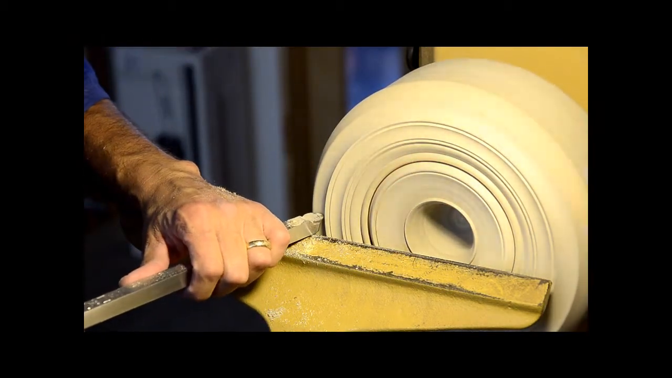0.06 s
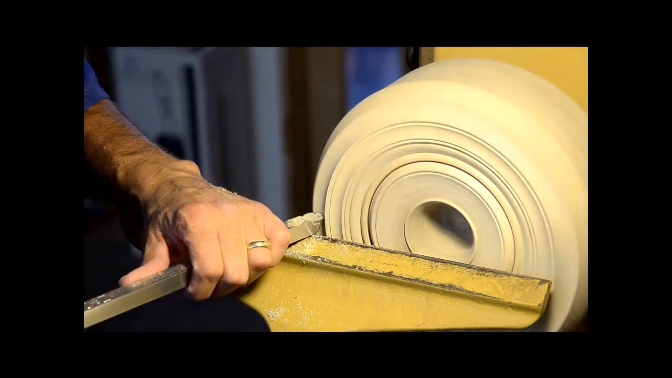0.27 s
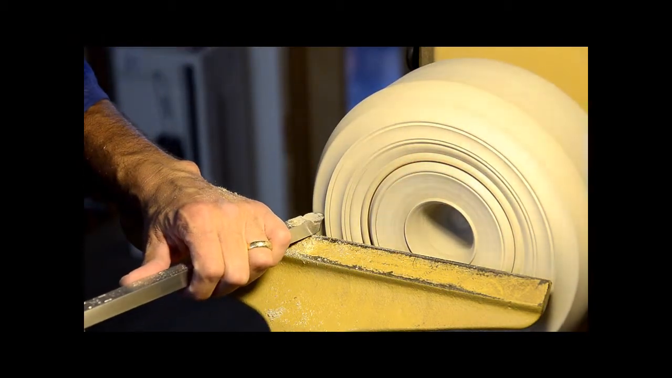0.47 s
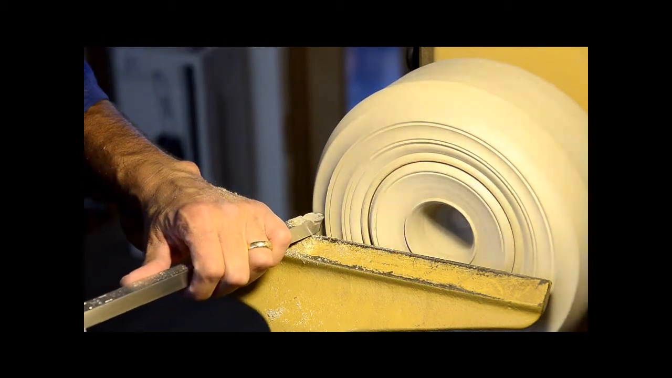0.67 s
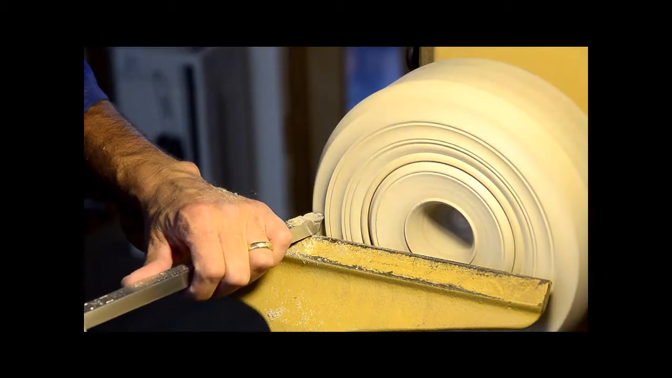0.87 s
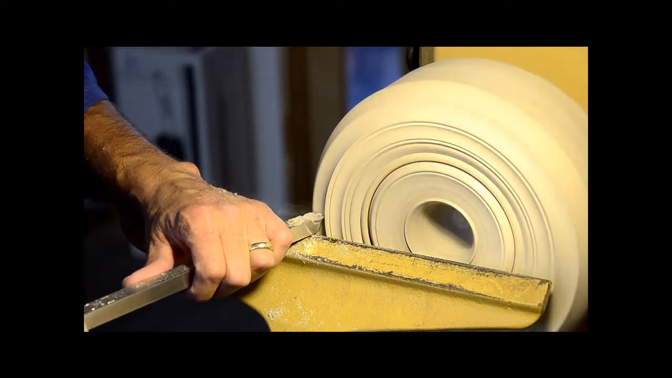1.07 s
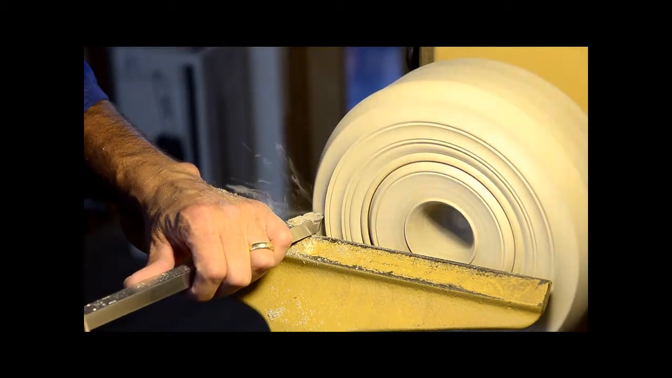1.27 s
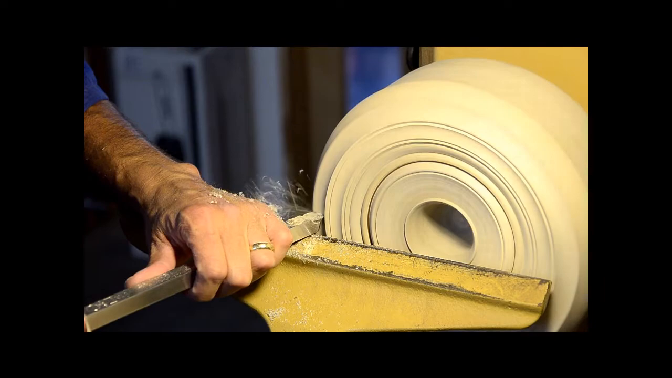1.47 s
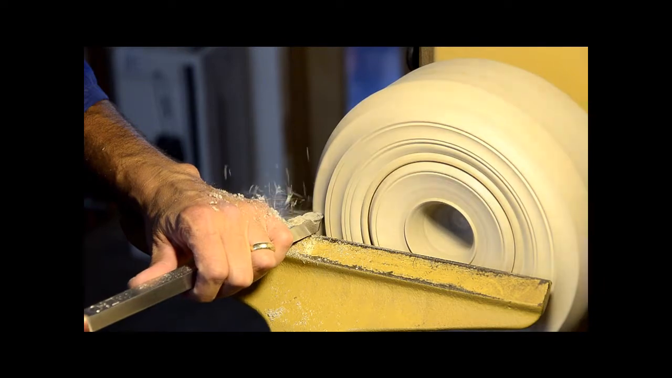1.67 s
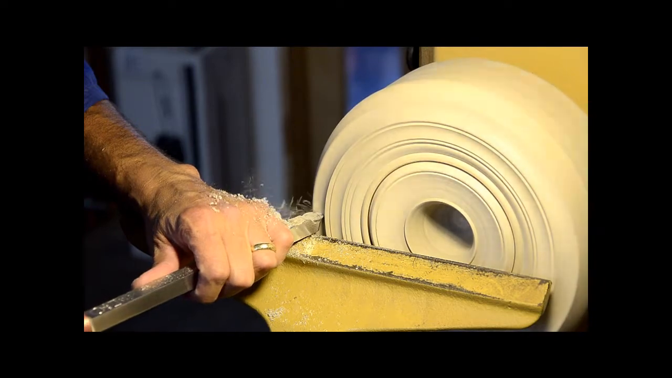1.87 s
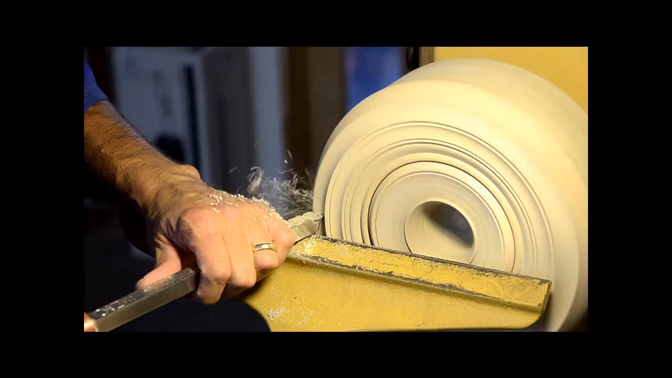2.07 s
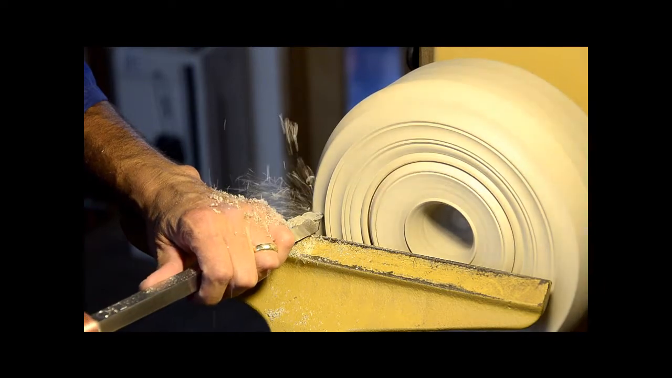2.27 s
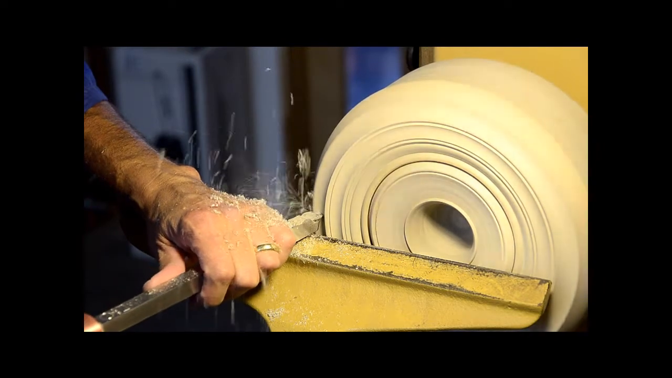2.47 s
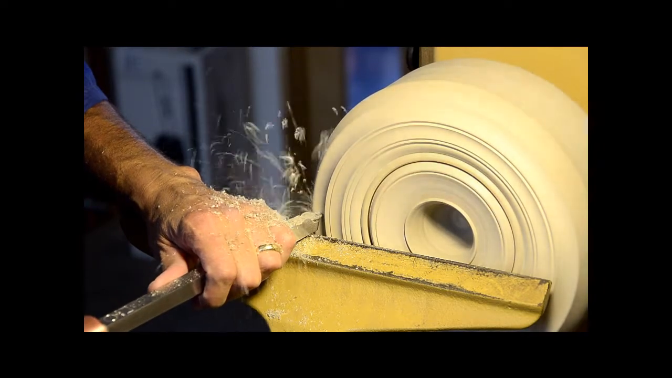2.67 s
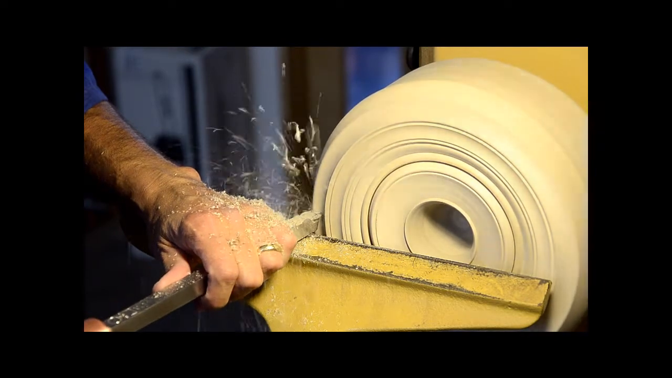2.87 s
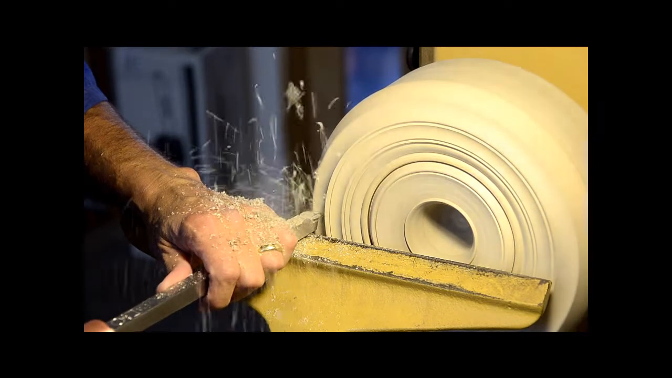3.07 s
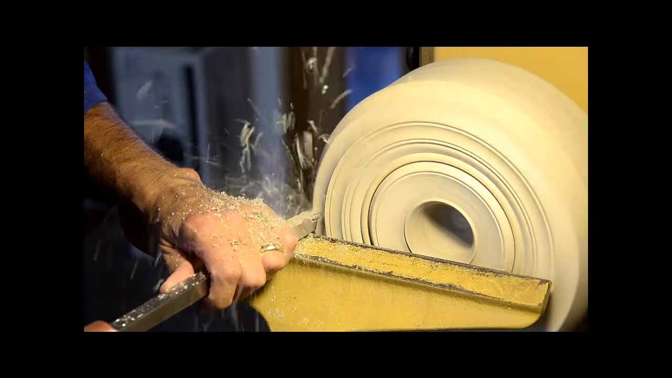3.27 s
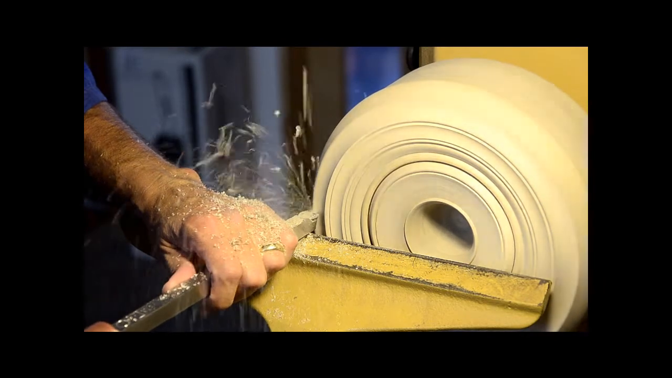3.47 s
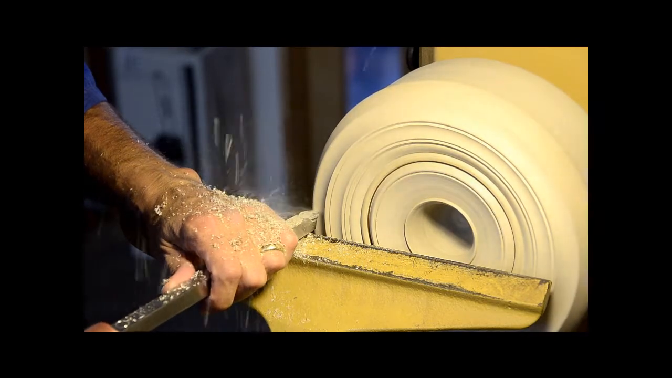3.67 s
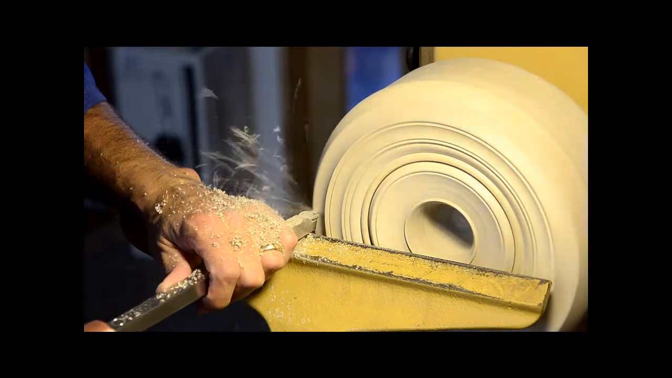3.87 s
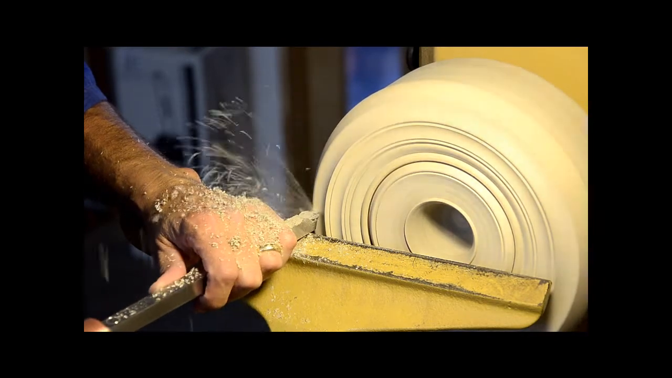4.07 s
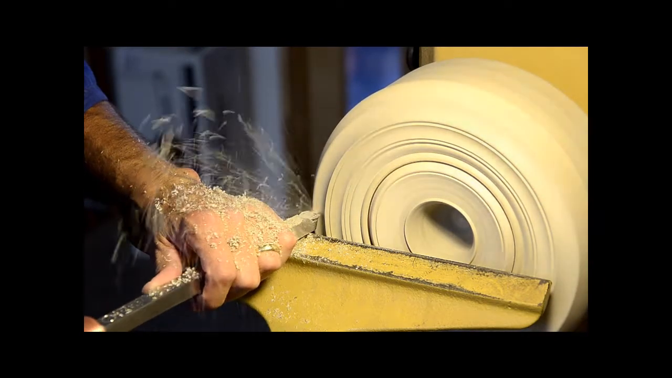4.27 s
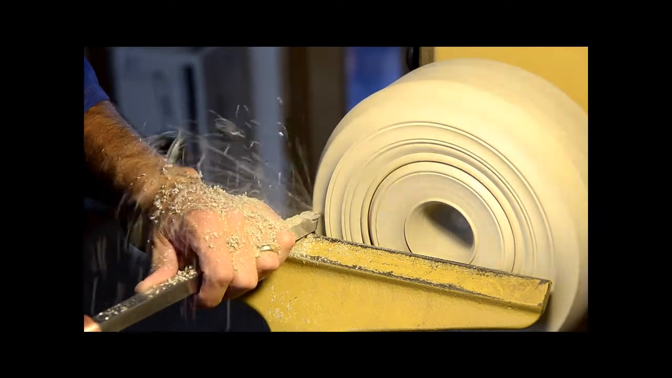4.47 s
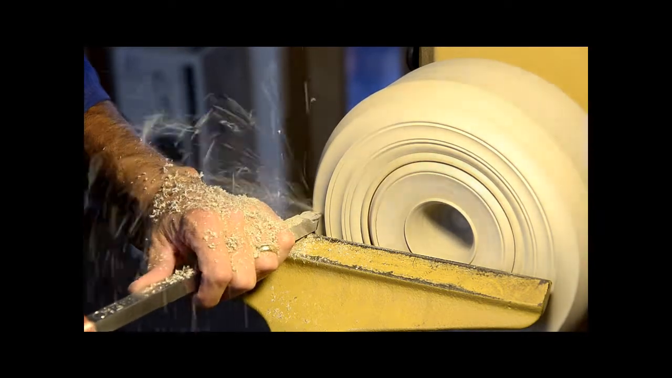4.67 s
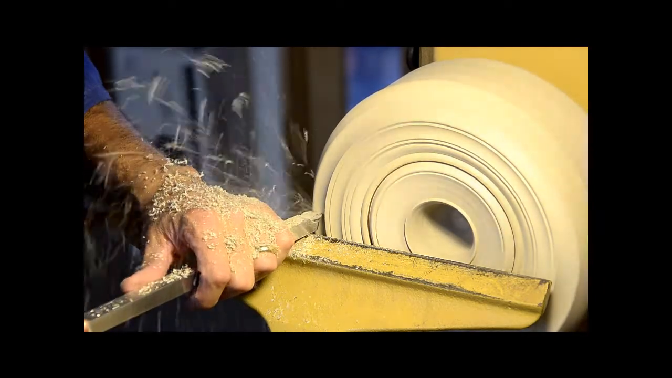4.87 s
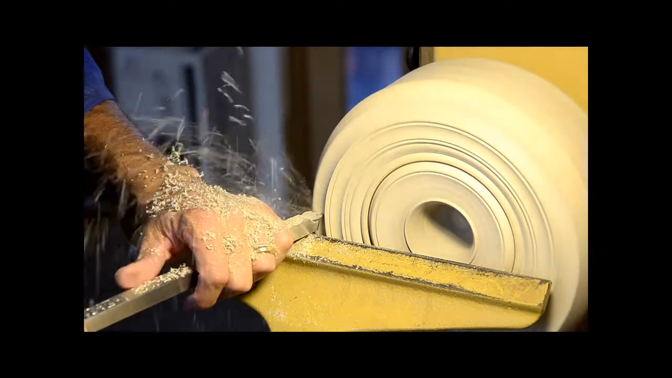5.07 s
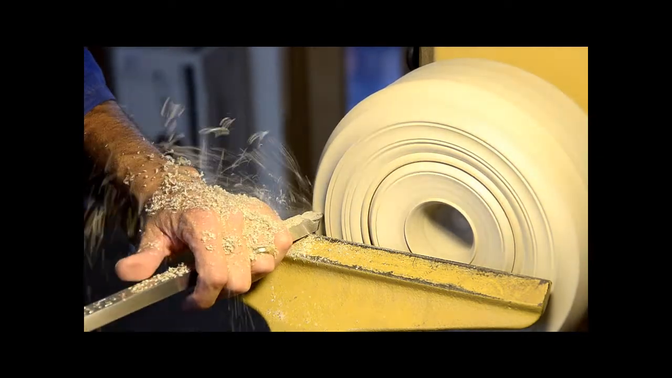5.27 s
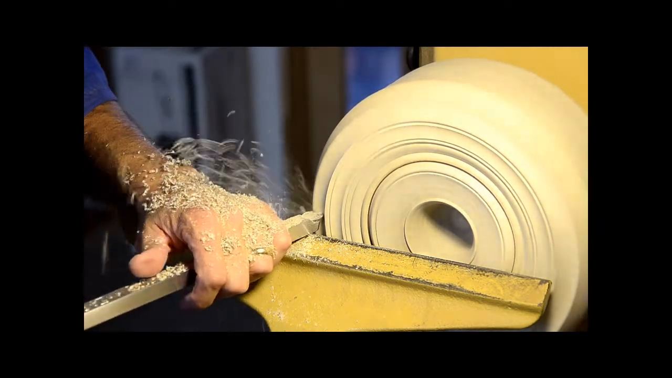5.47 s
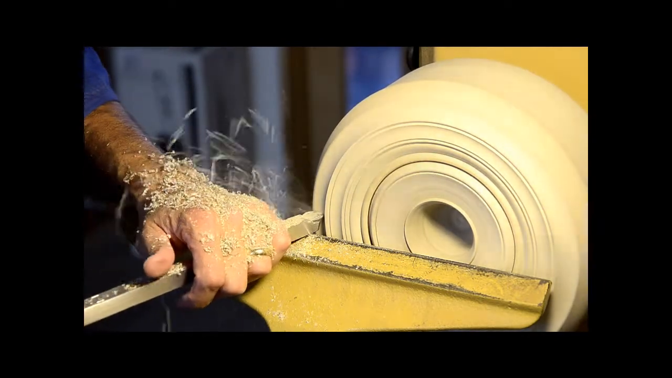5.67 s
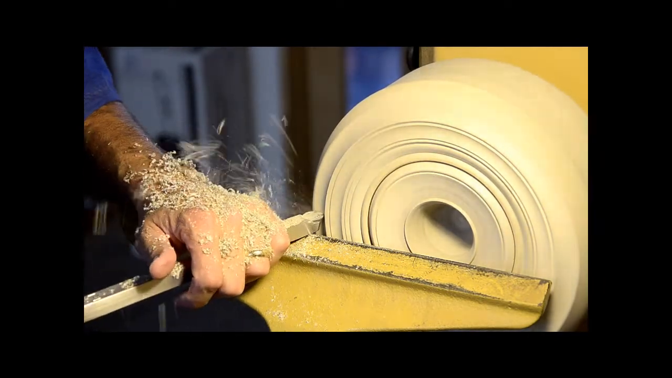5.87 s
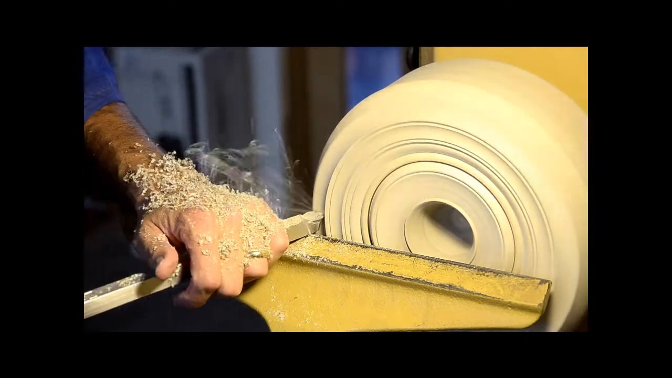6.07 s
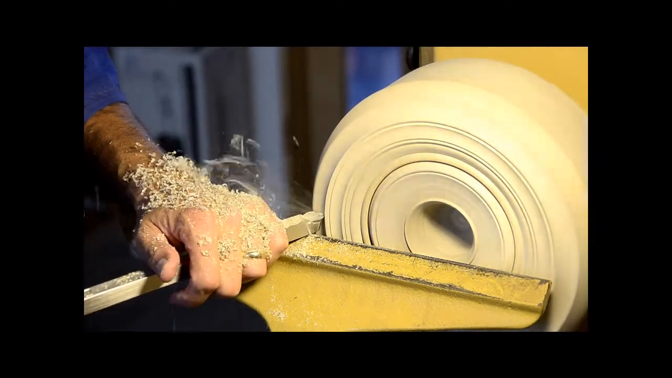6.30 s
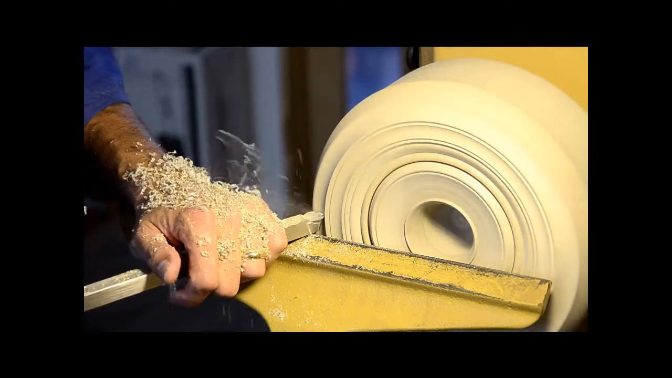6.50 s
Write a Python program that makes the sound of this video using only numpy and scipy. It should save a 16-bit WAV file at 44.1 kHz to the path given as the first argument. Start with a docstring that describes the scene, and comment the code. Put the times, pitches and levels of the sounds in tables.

```python
"""Gouge on a wooden bowl blank

One microphone in a workshop: a gouge cuts the rim of a blank on a lathe, over motor hum and drive whine.
The cut is noise through the modes of tool and rest; its bite slackens twice a turn with the wood grain and
its roughness returns in part from turn to turn. In the deepest pass a nearly steady tone, the tool's chatter,
led in by a rising note, bursts out once a turn. Steady tones, running noise and a low shake make the machine;
the walls answer the cut."""
import sys
import numpy as np
from scipy import signal
from scipy.fft import rfft, irfft, next_fast_len
from scipy.io import wavfile
from scipy.ndimage import uniform_filter1d, map_coordinates

SR = 44100
rng = np.random.default_rng(int(sys.argv[2]) if len(sys.argv) > 2 else 0)


def master(y):
    """Save y as 16-bit WAV."""
    cut = np.clip(np.atleast_2d(y).T, -1, 1)
    pcm = np.round(cut * 32767)  # scale
    wavfile.write(sys.argv[1], SR, pcm.astype(np.int16))


N = 288414
TURN = 3382  # samples per spindle turn


# Depth of the cut, heard as its level over a turn: time_s, level_db
CUT_DEPTH = [(.55, -52.5), (.9, -50), (1.18, -45.5), (1.27, -40.5), (1.39, -45), (1.55, -41), (1.7, -43.5),
             (1.93, -44), (2.13, -38), (2.22, -41.5), (2.34, -35.5), (2.44, -40), (2.65, -35.5),
             (2.77, -41), (2.85, -35), (2.98, -36), (3.27, -30.5), (3.5, -32.5), (3.74, -40.5), (3.87, -35),
             (3.99, -40.5), (4.05, -35.5), (4.43, -37.5), (4.49, -36), (4.84, -36), (5.24, -39),
             (5.53, -39), (5.61, -38.5), (6.0, -39.5), (6.32, -40.5), (6.54, -42)]
# Modes of each part, levels relative within a part: pitch_hz, width_hz, level_db
REST_MODES = [(263, 45, -24), (334, 9.9, -10.5), (718, 132, -9.5), (1190, 56, 1.5), (1265, 121, -3.5),
              (1870, 217, -4), (2057, 135, -0.5), (2683, 460, -5.5), (3447, 233, -7.5)]
SHANK_MODES = [(3743, 510, -2), (4594, 122, 4), (4576, 200, -1.5), (5075, 297, 6)]
TIP_MODES = [(6100, 390, -1), (7188, 217, 5.5), (7167, 330, 4.5), (7890, 1100, -7.5)]
FIBRE_MODES = [(9300, 1030, -3), (10290, 530, 1.5), (10630, 490, -2), (11210, 700, -11)]
DUST_MODES = [(11600, 4100, 2.2), (14300, 350, 3.2)]
# Share of rest, shank, tip, fibres, dust in the hiss:
# level_db (against an ordinary cut), slope_db (gained per dB of a deeper cut)
PART_LEVELS = [(-8.5, 0), (-4, 0.27), (-2.5, 0.28), (-8, 0), (-17, -.5)]
TURN_MEMORY = [.85, .55, .3, .25, .1, .6]
# Level added to the two highest bands: time_s, fibres_db, dust_db
TREBLE_LEVELS = [(.6, 1, -2), (1.3, 2, 0.5), (2.2, -1.5, -3), (2.9, 2.5, 2), (3.4, 0.5, -2), (4.0, 0, -1),
                 (4.9, 3, 3), (5.3, 1.5, 1), (5.8, -3, 1), (6.5, 1.5, 4)]
# Modes of tool and rest that stand out for a while: start_s, end_s, pitch_hz, level_db (against the cut)
STANDOUT_MODES = [(0, 1.32, 3880, -6.5), (.1, 1.26, 6350, -22), (.3, 1.7, 13750, -21),
                  (.82, 1.9, 7820, -7.5), (1.43, 2.64, 4440, -9.5), (2.603, 3.96, 6000, -14),
                  (2.806, 4.44, 5000, -22), (2.9, 3.89, 1890, -12.5), (4.3, 6.6, 2060, -20),
                  (3.618, 4.598, 3783, -6.5), (3.847, 4.878, 2837, -13), (3.89, 4.345, 4280, -9),
                  (4.397, 5.06, 4510, -7), (4.4, 5.2, 4900, -8), (4.8, 5.739, 5160, -3.5),
                  (4.6, 5.26, 9900, -17), (4.8, 5.803, 13500, -18), (5.401, 6.097, 8100, -6),
                  (5.47, 7.02, 4420, -9.5), (6.05, 6.8, 6680, -7.5)]
# Detour of the sound over a nearby face, about 0.3 m longer, as the tool travels: time_s, delay_ms
DETOUR_DELAY = [(.5, .91), (1.1, .87), (1.5, .892), (2, .89), (2.5, 0.94), (3.5, 0.96), (4, .95),
                (4.5, 0.898), (5, .876), (5.75, 0.92), (6.54, 0.86)]
CONTACT_S, CONTACT_RISE_S = .515, .012  # the edge first meets the wood
USUAL_DB = -38  # level of an ordinary cut
RING_Q = 27  # sharpness of a standout mode


def cut():
    """Tearing fibres drive rest and tool; higher parts follow the grain more, most of them remembering less."""
    depth_db = curves(CUT_DEPTH)[0]
    fibres_db, dust_db = curves(TREBLE_LEVELS)
    bite_db = grain()
    # hard and soft spots, met each turn
    rim = unit(uniform_filter1d(uniform_filter1d(surface(0.9), size=120), size=120))
    # chips break off in clumps
    tearing_db = 1.6 * rim + .8 * wobble(60) + 1.3 * wobble(400)

    def force(memory, grain_share, clump_share):
        """Surface noise pressed harder or softer by grain and clumps."""
        return unit(amp(grain_share * bite_db + clump_share * tearing_db) * surface(memory))

    # modes, extra dB, share of grain, share of clumps
    parts = [(REST_MODES, 0, .3, .4),
             (SHANK_MODES, 0, .9, .8),
             (TIP_MODES, 0, 1.1, .9),
             (FIBRE_MODES, fibres_db, 1.2, .9),
             (DUST_MODES, dust_db, 1.6, 1.1)]
    hiss = np.zeros(N)
    for (db, slope), memory, (modes, extra_db, grain_share, clump_share) in zip(PART_LEVELS, TURN_MEMORY, parts):
        level_db = db + slope * (depth_db - USUAL_DB) + extra_db
        hiss += amp(level_db) * ring(force(memory, grain_share, clump_share), modes, drift_db=.7)

    push = force(TURN_MEMORY[-1], 1.1, .7)
    for start, end, hz, db in STANDOUT_MODES:
        standout = unit(filtered(push, lambda f: peak(f, hz, hz / RING_Q)))
        hiss += amp(db) * swell(start, end) * standout

    # the treble of the late sound combs the spectrum
    late = map_coordinates(hiss, [np.arange(N) - curves(DETOUR_DELAY)[0] * SR / 1000])
    hiss = hiss + .45 * filtered(late, lambda f: f ** 2 / (f ** 2 + 4000 ** 2))
    touching = np.clip((np.arange(N) / SR - CONTACT_S) / CONTACT_RISE_S, 0, 1)
    return touching * amp(depth_db - 1.04) * hiss + spots()


# How much the cut feels the grain: time_s, factor
GRAIN_FEEL = [(.5, 1.7), (1.6, 1), (3.3, 1.7), (4.6, 1.1), (6.54, 1)]
SLACK_AT, SLACK_WIDTH = (.15, 0.717), 0.083  # places and width of slack bite, in shares of a turn
SLACK_DB, BITE_DB = -5, -1.5  # before the grain factor


def grain():
    """Bite around the blank in dB, slack at two places, scaled by how much the cut feels the grain."""
    share = np.arange(N) / TURN % 1
    slack_db = sum(SLACK_DB * np.exp(-((share - at) / SLACK_WIDTH) ** 2) for at in SLACK_AT)
    return curves(GRAIN_FEEL)[0] * (BITE_DB + slack_db)


def surface(memory):
    """Noise of which a share returns a turn later: the edge meets the ridges it left."""
    fresh = rng.standard_normal((N // TURN + 9, TURN))
    turns = signal.lfilter([1], [1, -np.clip(memory, 0, .95)], fresh, axis=0)
    return unit(turns[8:].ravel()[:N])  # the first turns only build up the ridges


def ring(force, modes, drift_db):
    """Modes driven in parallel; each one's strength drifts as the hand shifts on the steel."""
    out = np.zeros(N)
    for k, (hz, width_hz, db) in enumerate(modes):
        mode = filtered(force, lambda f: (-1) ** k * peak(f, hz, width_hz))  # alternating sign
        out += amp(db + drift_db * wobble(3.09)) * mode
    return unit(out)


# Spots on the rim that strike the edge once a turn; levels are those before the resonance:
# share (of a turn), start_s, end_s, level_db (over the cut), scatter_db, pitch_hz, width_hz, t60_s
RIM_SPOTS = [(.41, .55, 1.13, 10, 1, 14200, 2500, .008), (.22, .52, 1.1, 16, 1.5, 6400, 600, .12),
             (.23, .92, 2.65, 11, 3, 7800, 3000, .04), (.85, 3.19, 3.55, 17, 1.5, 5600, 2000, .06)]


def spots():
    """Each spot ticks at every turn while the edge crosses it, harder in a deeper cut."""
    depth_db, turns = curves(CUT_DEPTH)[0], np.arange(N // TURN)
    out = np.zeros(N)
    for share, start, end, db, scatter_db, hz, width_hz, t60 in RIM_SPOTS:
        s = (turns + share) * TURN / SR
        level_db = depth_db[(s * SR).astype(int)] + db + scatter_db * rng.standard_normal(len(s))
        crossed = (s > start) & (s < end)
        out += ticks(np.transpose([s, level_db])[crossed], hz, width_hz, t60)
    return out


def ticks(events, hz, width_hz, t60):
    """Decaying noise bursts, cut off after 1/30 s, through one steep resonance."""
    out, t = np.zeros(N), np.arange(SR // 30) / SR
    for s, db in events:
        envelope = amp(db - 60 * t / t60) * (1 - np.exp(-t / 0.00025))
        out[round(s * SR):][:len(t)] += envelope * rng.standard_normal(len(t))
    return filtered(out, lambda f: peak(f, hz, width_hz) ** 2)


# Chatter, levels against the cut before the pattern of each turn: time_s, pitch_hz, tone_db, rising_note_db
CHATTER_COURSE = [(2.6, 847, -40, -45), (2.9, 850, -16, -33), (3.12, 866, -11.5, -22),
                  (3.18, 853, -2.5, -17.5), (3.55, 863, -5, -10.5), (3.75, 857, -11.5, -10),
                  (4.2, 858, -14, -16.5), (4.4, 859, -16.5, -34), (5, 874, -46, -49)]
# Strength of the tone around the blank: share (of a turn), level_db
CHATTER_BURST = [(.04, -11), (.3, -8), (.47, 0), (.55, 5), (.7, 4), (.82, 1), (.94, 0)]
# Rising note into each burst: share (of a turn), pitch_hz, level_db
RISING_NOTE = [(.08, 630, -30), (.2, 655, -4), (.36, 720, 0), (.52, 800, -1), (.65, 850, -30)]


def chatter():
    """The tool sings on its rest over one stretch of the rim, after a rising note, with knocking and a thump below."""
    hz, level_db, note_db = curves(CHATTER_COURSE)
    tone = np.sqrt(2) * np.sin(2 * np.pi * np.cumsum(hz) / SR + .3 * wobble(70))
    share, note_hz, shape_db = np.transpose(RISING_NOTE)
    rise_hz, rise_db = around(share, note_hz), around(share, shape_db)
    rise = np.sqrt(2) * np.sin(2 * np.pi * np.cumsum(rise_hz) / SR + .7 * wobble(90))
    rise *= amp(note_db + rise_db + 1.5 * wobble(60))
    knock = unit(filtered(surface(1.0), lambda f: peak(f, 970, 460) ** 2))
    thump = unit(filtered(surface(.85), lambda f: peak(f, 248, 40) ** 2))
    burst_db = around(*np.transpose(CHATTER_BURST)) + .6 * wobble(40)
    song = amp(burst_db) * tone + amp(-10.5) * knock + amp(-24) * thump
    return amp(curves(CUT_DEPTH)[0]) * (amp(level_db) * song + rise)


# Motor and belt tones: pitch_hz, level_db
HUM_TONES = [(170, -80), (554.5, -76), (586.8, -74), (716, -74), (782.9, -67), (882.9, -74), (1158.2, -60),
             (1190.8, -67), (1330, -77), (1572, -73)]
# Drive tones: offset (multiples of the supply frequency off the carrier), level_db
WHINE_TONES = [(-17, -76), (-14, -77), (-12, -75), (-11, -78), (-9, -71), (-8, -72), (-7, -74), (-6, -71),
               (-4, -79), (-3, -74), (-2, -73), (-1, -78), (0, -59), (1, -64), (2, -61), (3, -71), (4, -69),
               (5, -79), (9, -73), (10, -73), (11, -70), (12, -71), (13, -66), (14, -66), (15, -69),
               (16, -71)]
CARRIER_HZ, SUPPLY_HZ = 9837.4, 65.25
# Spectrum of the running noise, relative: pitch_hz, level_db (per Hz)
RUNNING_NOISE = [(20, -40), (35, -15), (60, -13), (100, -14.5), (200, -14.5), (280, -8), (400, -13.5),
                 (750, -4), (1000, -4), (1170, -2), (1500, -7), (2500, -9), (5000, -22.5), (8500, -17.5),
                 (9300, -25), (9900, -14), (10300, -8), (10750, -10), (11200, -22), (12500, -42),
                 (15700, -37)]
# The stand shakes: time_s, level_db
STAND_SHAKE = [(0, -93), (1.4, -98), (1.8, -86), (2.1, -94), (2.9, -85), (4.5, -76.5), (6.54, -82)]
# A tone that comes and goes: time_s, level_db
WAVER_LEVEL = [(0, -67.5), (1.5, -75), (2.7, -69.5), (3.1, -80), (4.5, -71.5), (5.3, -77), (6.54, -74)]
# Swells of the low drone: start_s, end_s, rise_db
DRONE_RISES = [(4.396, 5.2, 11.5), (6.1, 7, 14.5)]
WAVER_HZ = 457
DRONE_HZ, DRONE_DB = 117, -89  # level between its swells


def machine():
    """Slightly unsteady tones of motor and drive over running noise and the stand's shake."""
    t = np.arange(N) / SR
    tones = [(hz, db, .4) for hz, db in HUM_TONES]  # the last column is phase waver in radians
    tones += [(CARRIER_HZ + k * SUPPLY_HZ, db, .15) for k, db in WHINE_TONES]
    lines = np.zeros(N)
    for hz, db, waver in tones:
        phase = 2 * np.pi * (hz * t + rng.random()) + waver * wobble(8)
        lines += np.sqrt(2) * amp(db + 1.5 * wobble(6)) * np.sin(phase)

    drone_db = DRONE_DB + sum(db * swell(start, end) for start, end, db in DRONE_RISES)
    for hz, db in [(WAVER_HZ, curves(WAVER_LEVEL)[0]), (DRONE_HZ, drone_db)]:
        lines += np.sqrt(2) * amp(db + 2.7 * wobble(5)) * np.sin(2 * np.pi * hz * t + 0.5 * wobble(11))

    hz, db = np.transpose(RUNNING_NOISE)
    spectrum = lambda f: amp(np.interp(np.log(f + 1), np.log(hz), db))
    noise = unit(filtered(rng.standard_normal(N), spectrum))
    shake = np.sqrt(2) * np.sin(2 * np.pi * 33 * t + .5 * wobble(4))
    return lines + amp(-54.0) * noise + amp(curves(STAND_SHAKE)[0]) * shake


def workshop(x, t60, wet_db):
    """The direct sound and a short, duller answer of the walls: decaying noise that starts 3 ms later."""
    t = np.arange(SR // 3) / SR
    tail = amp(-60 * t / t60) * rng.standard_normal(len(t)) * (t > .003)
    wet = signal.fftconvolve(x, tail / np.linalg.norm(tail))[:N]
    return x + amp(wet_db) * filtered(wet, lambda f: 1 / (1 + (f / 6000) ** 2))


def amp(db):
    """Gain of a level in dB."""
    return 10 ** (np.asarray(db) / 20)


def unit(x):
    """Scaled to rms 1."""
    return x / np.sqrt(np.mean(x ** 2) + 1e-20)


def curves(rows):
    """One value per sample for each column after the time."""
    s, *cols = np.transpose(rows)
    return [np.interp(np.arange(N) / SR, s, c) for c in cols]


def around(share, value):
    """A pattern on the blank's rim, met again at every turn."""
    return np.interp(np.arange(N) / TURN, share, value, period=1)


def swell(start, end):
    """Half a sine between two times."""
    return np.sin(np.pi * np.clip((np.arange(N) / SR - start) / (end - start), 0, 1))


def wobble(rate):
    """A smooth random curve, rate knots a second."""
    coarse = np.arange(0, N + 16, 16)
    knots = rng.standard_normal(int(N * rate / SR) + 4)
    return np.interp(np.arange(N), coarse, map_coordinates(knots, [coarse * rate / SR]))


def filtered(x, response):
    """x through a complex response of frequency."""
    m = next_fast_len(N + SR // 2)
    return irfft(rfft(x, m) * response(np.fft.rfftfreq(m, 1 / SR)), m)[:N]


def peak(f, hz, width_hz):
    """One resonance, gain 1 at its centre."""
    return 1j * f * width_hz / (hz * hz - f * f + 1j * f * width_hz)


def scene():
    """Cut, chatter and machine at one microphone in the workshop; the walls answer the cut."""
    return (workshop(cut(), t60=0.078, wet_db=-2.5) + chatter() + machine())[None]


# Dips of the microphone's housing: pitch_hz, width_hz, depth (0-1)
HOUSING_DIPS = [(5720, 420, .88), (6930, 150, .65), (2300, 200, .6)]
TOP_HZ = 15760  # band limit


def record(dry):
    """The microphone's housing dips at a few frequencies; nothing is kept above the band limit."""
    def response(f):
        """Housing dips, then a steep fall towards the band limit."""
        dips = np.prod([1 - np.clip(depth, 0, .9) * peak(f, hz, width_hz)
                        for hz, width_hz, depth in HOUSING_DIPS], axis=0)
        edge = (1 - .9 * peak(f, 15000, 500)) / (1 + (f / 15200) ** 14)
        return dips * edge * (f < TOP_HZ)
    return filtered(dry[0], response)[None]


dry = scene()
out = record(dry)
master(out)
```